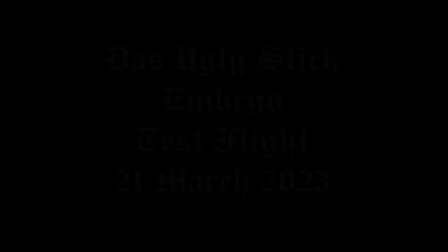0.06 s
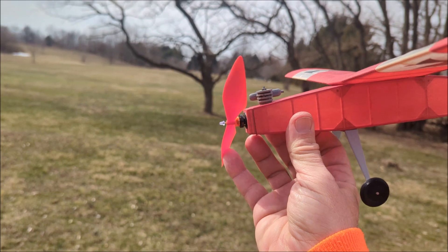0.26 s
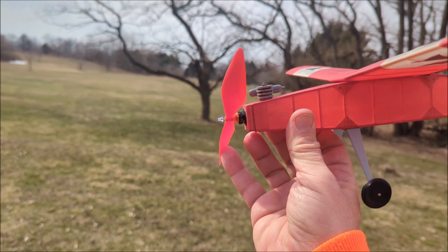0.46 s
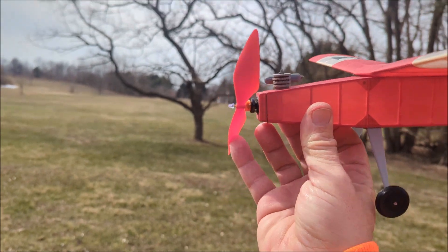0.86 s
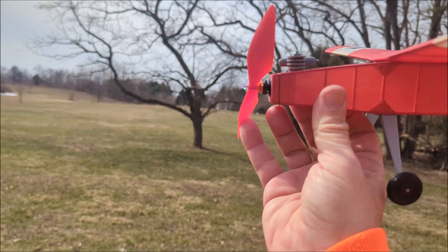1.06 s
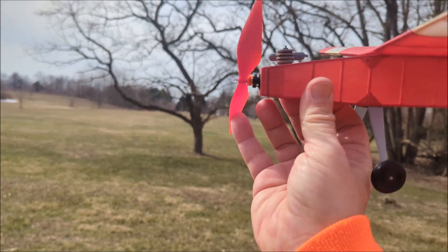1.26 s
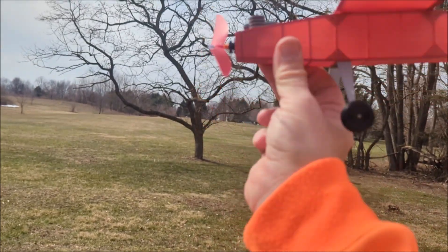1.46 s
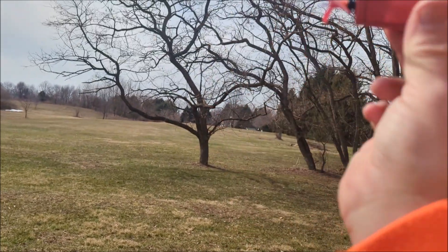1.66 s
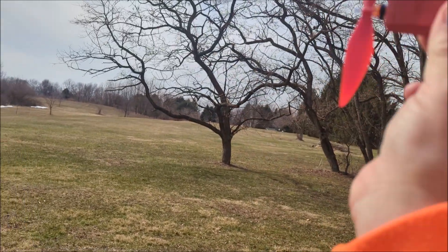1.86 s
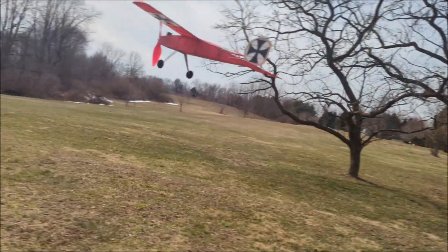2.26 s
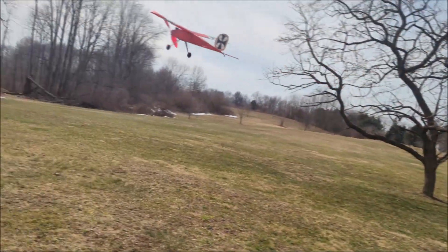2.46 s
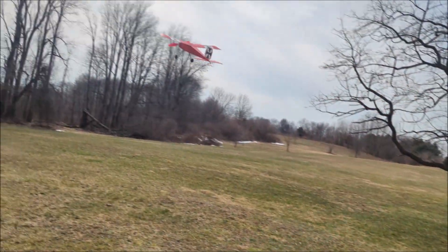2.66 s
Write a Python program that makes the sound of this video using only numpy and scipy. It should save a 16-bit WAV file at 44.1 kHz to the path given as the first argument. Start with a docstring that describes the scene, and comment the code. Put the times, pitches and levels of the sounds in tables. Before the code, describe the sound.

Fingers tick on a model plane before it snaps free, its propeller rattling in light wind.

```python
"""An open field, a rubber-powered model plane held up and thrown an arm's length from the microphone.
Close in, a sleeve rustles and fingers tick, creak and squeak on the hollow wooden frame. The plane snaps
free and flies off, its unwinding rubber and propeller shaft rattling once a turn.
Light wind rumbles on the microphone; behind it lie a distant hush and one far bird."""
import sys
import numpy as np
from scipy import signal
from scipy.io import wavfile
from scipy.ndimage import uniform_filter1d

SR = 44100
rng = np.random.default_rng(int(sys.argv[2]) if len(sys.argv) > 2 else 0)


def generate_wav(sig):
    """Save sig (samples, or channels by samples) to the path in sys.argv[1] as 16-bit PCM at SR."""
    pcm = np.round(np.clip(np.atleast_2d(sig).T, -1, 1) * 32767).astype(np.int16)
    wavfile.write(sys.argv[1], SR, pcm)


N = 119070
T = np.arange(N) / SR

# wind on the microphone (time [s], level [dB], left over right [dB])
WIND_GUSTS = [(.23, -43.5, 8), (.375, -45, 13), (.43, -48.5, 6.5), (.6, -50, -2), (.76, -49.5, -6),
              (.89, -48, -8.5), (.95, -54, -2), (1.02, -45, -10), (1.16, -52.5, -7), (1.53, -46.5, -5.5),
              (1.66, -50, 2), (1.82, -47, 3.5), (2.08, -38, -6), (2.15, -37, -18), (2.3, -54, -8),
              (2.42, -54, -14), (2.5, -69, -5), (2.7, -59, -17)]
# its rumble (frequency [Hz], relative level [dB])
WIND_SPECTRUM = [(30, -31), (42, -12), (55, 5), (80, -3), (115, -8), (170, -14), (260, -26.5), (450, -44),
                 (1200, -77), (4000, -87)]
# distant hush of the field (frequency [Hz], relative level [dB])
HUSH_SPECTRUM = [(250, 0.5), (410, -5), (550, 3.5), (800, -2), (1200, -11), (1900, -28.5), (3500, -35),
                 (8000, -41.5), (16000, -44)]

# sleeve rubbing as the arm moves (time [s], level [dB])
SLEEVE_LEVELS = [(.56, -102), (.625, -77), (.68, -87.5), (.81, -92), (.853, -67), (.885, -68), (.97, -89),
                 (1.32, -81.5), (1.365, -77), (1.47, -67), (1.53, -75.5), (1.7, -72.5), (1.865, -66.5),
                 (1.912, -52.5), (1.942, -59), (1.972, -56.5), (2.02, -63.5), (2.065, -59.5),
                 (2.105, -54.5), (2.2, -55), (2.27, -69), (2.335, -64), (2.385, -70), (2.45, -68),
                 (2.5, -76.5), (2.7, -88)]
# its bright swish (frequency [Hz], relative level [dB])
SLEEVE_SPECTRUM = [(200, -13.5), (600, 8.5), (1200, 9), (2200, 0), (3700, 1), (5200, -2), (9000, 1),
                   (10000, -2.5), (16000, -1)]
# hand rubbing on the frame, then the flying plane's faint steady patter (time [s], level [dB])
SLIP_LEVELS = [(.55, -90), (.625, -73.5), (.79, -93), (.865, -61), (.97, -78.5), (1.4, -69.5),
               (1.58, -61.5), (1.64, -67.5), (1.75, -59.5), (1.9, -61), (2.05, -58), (2.14, -65),
               (2.2, -52), (2.26, -68.5), (2.7, -71)]
# its dull tone (frequency [Hz], relative level [dB])
GRIP_SPECTRUM = [(350, 3), (440, -1.5), (550, 6.5), (800, 1), (1150, 2), (1500, -9.5), (2200, -11.5),
                 (3700, -17.5), (5000, -31), (16000, -48.5)]

# finger ticks (time [s], body [dB], crack [dB], crack decay [ms], crack left over right [dB])
FINGER_TICKS = [(0.8832, -37, -68, 1.6, 18), (1.131, -34.5, -70, 0.71, 31), (1.1514, -34, -56.5, 0.97, 5.5),
                (1.4636, -28, -61, 1.6, 12), (1.8233, -37, -47.5, 1.8, -20), (1.9873, -40, -41.5, 0.61, 4),
                (2.1, -39, -38.5, 2.9, 1), (2.175, -47, -45, 1.3, -6), (2.3478, -34.5, -66, .8, 14),
                (2.4214, -36.5, -49, 3.9, 3), (2.4647, -32, -58.5, 0.92, 11)]
# woody body of a tick (frequency [Hz], relative level [dB])
BODY_SPECTRUM = [(200, -12), (700, -1.5), (1150, 6.5), (1500, -0.5), (2000, -23), (3000, -35), (3750, -7.5),
                 (4600, -21), (16000, -56)]
# bright crack of a tick (frequency [Hz], relative level [dB])
CRACK_SPECTRUM = [(300, -35), (1400, -6.5), (2500, 0), (3800, 3), (5500, -2), (8500, 9), (10000, -2),
                  (14000, 0.5), (16000, -2)]
# skin scraping the covering (time [s], hold [s], level [dB], left over right [dB])
SKIN_SCRAPES = [(0.856, 0.0023, -56.5, 17), (0.861, 0.016, -64, -2), (0.8813, 0.0032, -51.5, 9),
                (1.129, 0.00057, -62.5, 6), (1.445, 0.01, -60.5, -1), (2.313, 0.023, -79, 6)]
# their crisp hiss (frequency [Hz], relative level [dB])
SCRAPE_SPECTRUM = [(4000, -13.5), (6500, 1), (11500, 1.5), (14000, 2)]
# creaks of the gripped frame (time [s], level [dB], decay of the push [ms])
FRAME_CREAKS = [(1.568, -51, 11.5), (1.679, -49, 11), (1.731, -45.5, 3.4), (1.853, -46.5, 3.5),
                (1.871, -45.5, 3.5)]
# modes a creak rings (frequency [Hz], relative level [dB], T60 [s])
FRAME_MODES = [(599, -9.5, 0.071), (773, 4, 0.018), (1030, 4, 0.018), (1120, -7.5, 0.022),
               (1690, -7, 0.016), (2070, -9, 0.035), (3550, -16, 0.021)]

# far bird (time [s], starting pitch [Hz], level [dB])
BIRD_NOTES = [(1.04, 4300, -92.5), (1.195, 4000, -86.5), (1.242, 3250, -87), (1.255, 3930, -87.5)]
# close squeaks (time [s], length [s], start [Hz], end [Hz], level [dB], left over right [dB])
SLIP_SQUEAKS = [(1.787, 0.049, 4900, 5170, -65, -8), (1.802, 0.022, 1950, 2160, -59.5, -11),
                (1.815, 0.018, 3324, 3430, -55.5, -8), (2.307, 0.017, 6600, 7460, -59.5, 4),
                (2.31, 0.032, 7900, 8570, -59, 11)]
# jolts of the fuselage (time [s], level of the push [dB], decay [ms], band centre [Hz])
FUSELAGE_JOLTS = [(2.099, -39, 8, 2900), (2.105, -43.5, 3.5, 690), (2.419, -46.5, 7.7, 2240)]
# hollow fuselage (frequency [Hz], relative level [dB], T60 [s])
FUSELAGE_MODES = [(366, -15, 0.19), (555.6, 10, 0.065), (786, 6, 0.03), (912, 8, 0.02), (1200, -9, 0.022),
                  (1840, -24, 0.038), (1960, 2.5, 0.022), (2596, 2, 0.021), (3120, 5, 0.0045),
                  (4230, 0.5, 0.012)]
# propeller turns (time [s], thrum [dB], rattle [dB])
PROPELLER_TURNS = [(2.254, -54, -67), (2.292, -52.5, -63.5), (2.323, -63, -60.5), (2.366, -55, -87),
                   (2.403, -64, -59.5), (2.436, -51.5, -49.5), (2.477, -62.5, -78), (2.518, -62, -67),
                   (2.551, -58.5, -62), (2.586, -57.5, -60), (2.622, -62, -56.5), (2.659, -59.5, -65.5),
                   (2.693, -69, -59.5)]
# rattle of rubber and shaft (frequency [Hz], relative level [dB])
RATTLE_SPECTRUM = [(300, -13), (900, 12.5), (3500, 6), (5000, 0.5), (6500, -3.5), (16000, -24.5)]

FRAME_LIKENESS = 0.62  # left-right correlation of the frame's sounds at the microphone
SNAP_RISE_S = 0.00097


def amp(db):
    """Decibels to gain."""
    return 10 ** (np.asarray(db) / 20)


def unit(x):
    """Scales to rms 1."""
    return x / np.sqrt(np.mean(x ** 2) + 1e-20)


def curve(rows, column=1):
    """One column of a timed table, at every sample."""
    rows = np.array(rows)
    return np.interp(T, rows[:, 0], rows[:, column])


def pan(db):
    """Left and right gains of constant power, the left louder by db."""
    gains = np.array([amp(db / 2), amp(-db / 2)]).reshape(2, -1)
    return gains / np.sqrt((gains ** 2).mean(0))


def add(mix, s, sound):
    """Mixes a stereo sound in at s seconds."""
    part = mix[:, round(s * SR):][:, :sound.shape[1]]
    part += sound[:, :part.shape[1]]


def pair(three, likeness):
    """Two channels correlated by likeness, from one shared and two separate signals."""
    return np.sqrt(likeness) * unit(three[0]) + np.sqrt(1 - likeness) * unit(three[1:])


def noise(likeness):
    """Stereo white noise."""
    return pair(rng.standard_normal((3, N)), likeness)


def grains(per_s, spread_db, likeness):
    """Dense random slips of uneven size."""
    sizes = amp(spread_db * np.minimum(rng.exponential(1, N), 4))
    slips = rng.random(N) < per_s / SR
    return pair(sizes * slips * rng.choice([-1., 1.], (3, N)), likeness)


def colour(x, spectrum, size=8192):
    """Minimum-phase filter of unit energy with the given spectrum."""
    hz, db = np.transpose(spectrum)
    bins_hz = abs(np.fft.fftfreq(size, 1 / SR))
    log_gain = np.log(amp(np.interp(np.log(bins_hz + 1), np.log(hz), db)))
    response = np.exp(np.conj(signal.hilbert(log_gain)))
    taps = np.fft.ifft(response).real[:size // 2]
    return signal.fftconvolve(x, taps[None] / np.linalg.norm(taps), axes=1)[:, :N]


def ring(x, modes):
    """Rings a table of damped modes, with unit energy."""
    t = T[:SR // 5]
    taps = sum(amp(db - 60 * t / t60) * np.sin(2 * np.pi * hz * t) for hz, db, t60 in modes)
    return signal.fftconvolve(x, taps[None] / np.linalg.norm(taps), axes=1)[:, :N]


def burst(source, s, decay_s, rise_s=SNAP_RISE_S, hold_s=0):
    """The source from s seconds on, under a rise, hold and decay that alone set its energy."""
    t = T[:SR // 12]
    shape = np.minimum(t / rise_s, 1) * np.exp(-np.maximum(t - rise_s - hold_s, 0) / decay_s)
    piece = np.roll(source, -round(s * SR), 1)[:, :len(t)] * shape
    return unit(piece) * np.sqrt(np.mean(shape ** 2))


def whistle(length_s, from_hz, to_hz, width_hz):
    """A narrow band of noise gliding in pitch, with soft edges."""
    n = round(length_s * SR)
    pole = np.exp(-np.pi * width_hz / SR)
    waver = signal.lfilter([1], [1, -pole], noise(0.45) + 1j * noise(0.24))[:, -n:]
    glide = np.exp(2j * np.pi * np.cumsum(np.linspace(from_hz, to_hz, n)) / SR)
    return np.sqrt(np.hanning(n)) * unit((waver * glide).real)


def wind():
    """Light wind buffets each port of the microphone separately."""
    rumble = colour(noise(likeness=0.0079), WIND_SPECTRUM)
    running_rms = np.sqrt(uniform_filter1d(rumble ** 2, size=3000, axis=1) + 1e-9)
    return rumble / running_rms * amp(curve(WIND_GUSTS)) * pan(curve(WIND_GUSTS, column=2))


def hush(level_db=-65):
    """The steady, soft noise of the field in the distance."""
    return amp(level_db) * colour(noise(likeness=0.5), HUSH_SPECTRUM)


def rustle():
    """At arm's length, the sleeve rubs in a smooth swish and the grip in tiny, dull slips; once the plane
    flies, the same slips run on as its faint steady patter."""
    sleeve = colour(noise(likeness=0.04), SLEEVE_SPECTRUM)
    grip = colour(grains(per_s=5000, spread_db=1, likeness=FRAME_LIKENESS), GRIP_SPECTRUM)
    return sleeve * amp(curve(SLEEVE_LEVELS)) + grip * amp(curve(SLIP_LEVELS))


def fingers():
    """Close up, fingers tick on the light wooden frame, scrape its covering and make it creak."""
    body, crack, scrape, creak = np.zeros((4, 2, N))
    push, grit = noise(FRAME_LIKENESS), noise(likeness=0.13)
    for s, body_db, crack_db, decay_ms, side_db in FINGER_TICKS:
        add(body, s, amp(body_db) * pan(side_db / 2))  # one impulse, nearer the centre than its crack
        add(crack, s, amp(crack_db) * pan(side_db) * burst(grit, s, decay_ms / 1000))
    for s, hold_s, db, side_db in SKIN_SCRAPES:
        add(scrape, s, amp(db) * pan(side_db) * burst(grit, s, decay_s=SNAP_RISE_S, hold_s=hold_s))
    for s, db, decay_ms in FRAME_CREAKS:
        force = burst(push, s, decay_ms / 1000, rise_s=0.0016)
        add(creak, s, amp(db) * ring(force, FRAME_MODES))
    ticks = colour(body, BODY_SPECTRUM) + colour(crack, CRACK_SPECTRUM)
    return ticks + colour(scrape, SCRAPE_SPECTRUM) + creak


def bird(note_s=0.061, fall=0.088):
    """Far off, a faint twitter of falling notes, blurred by the trees."""
    out = np.zeros((2, N))
    for s, hz, db in BIRD_NOTES:
        add(out, s, amp(db) * whistle(note_s, hz, hz * (1 - fall), width_hz=70))
    return out


def squeaks():
    """Brief, rising stick-slip whistles near the microphone."""
    out = np.zeros((2, N))
    for s, length_s, from_hz, to_hz, db, side_db in SLIP_SQUEAKS:
        add(out, s, amp(db) * pan(side_db) * whistle(length_s, from_hz, to_hz, width_hz=140))
    return out


def jolts(crack_db=-2.5):
    """The frame cracks and rings as it snaps free of the hand, and again as the rubber jerks in flight."""
    force, push = np.zeros((2, N)), noise(FRAME_LIKENESS)
    for s, db, decay_ms, hz in FUSELAGE_JOLTS:
        band = signal.lfilter(*signal.butter(2, [hz / 2, hz * 2], "band", fs=SR), push)
        add(force, s, amp(db) * burst(band, s, decay_ms / 1000))
    return amp(crack_db) * force + ring(force, FUSELAGE_MODES)


def propeller(thrum_top_hz=690, rise_s=0.0015, hold_s=0.0034):
    """Once a turn, the unwinding rubber and the shaft rattle and shake the hollow fuselage."""
    thrum, rattle = np.zeros((2, 2, N))
    force = signal.lfilter(*signal.butter(2, thrum_top_hz, fs=SR), noise(likeness=0.99))
    shake = ring(force, FUSELAGE_MODES)
    chatter = grains(per_s=2500, spread_db=1.7, likeness=0.11)
    for s, thrum_db, rattle_db in PROPELLER_TURNS:
        add(thrum, s, amp(thrum_db) * burst(shake, s, decay_s=0.014, rise_s=rise_s, hold_s=hold_s))
        add(rattle, s, amp(rattle_db) * burst(chatter, s, decay_s=0.013, rise_s=rise_s, hold_s=hold_s))
    return thrum + colour(rattle, RATTLE_SPECTRUM)


def bump(at_s=2.374, length_s=0.0171, hz=154.5, level_db=-39.5):
    """One soft, low bump, dead centre, just after the throw."""
    out = np.zeros((2, N))
    t = np.arange(0, length_s, 1 / SR)
    pulse = np.hanning(len(t)) * np.sin(2 * np.pi * hz * t)
    add(out, at_s, amp(level_db) * pan(0) * pulse)
    return out


def scene(scatter_db=-5.5, scatter_t60_s=0.064):
    """Close sounds with a short scatter off body and ground; wind, bump and distance stay dry."""
    near = rustle() + fingers() + squeaks() + jolts() + propeller()
    t = T[:SR // 4]
    tail = rng.standard_normal((2, len(t))) * amp(-60 * t / scatter_t60_s) * (t > .002)
    scatter = signal.fftconvolve(near, tail / np.linalg.norm(tail[0]), axes=1)[:, :N]
    return near + amp(scatter_db) * scatter + wind() + bump() + hush() + bird()


def record(dry, start_s=0.228, bass_cut_hz=29.3, top_hz=15800):
    """Silence at first; then the microphone's bass cut and band limit."""
    begun = dry * np.clip((T - start_s) / .002, 0, 1)
    bass_cut = signal.butter(4, bass_cut_hz, "high", fs=SR, output="sos")
    band_limit = signal.firwin(511, top_hz, window=("kaiser", 9), fs=SR)
    return signal.oaconvolve(signal.sosfilt(bass_cut, begun), band_limit[None], "same")


dry = scene()
out = record(dry)
generate_wav(out)
```